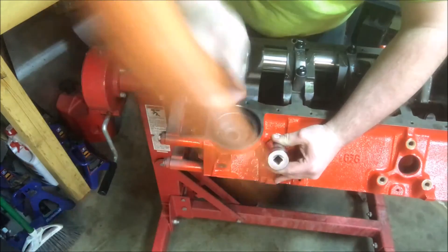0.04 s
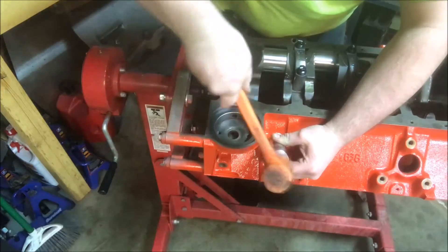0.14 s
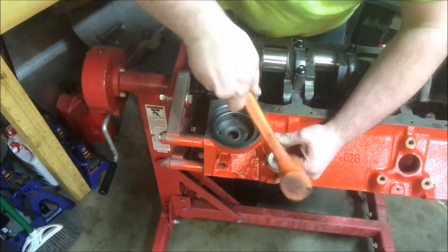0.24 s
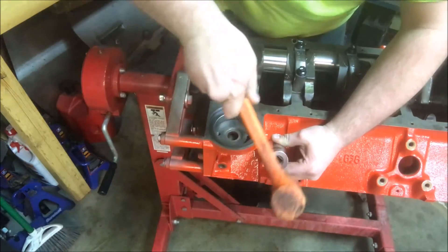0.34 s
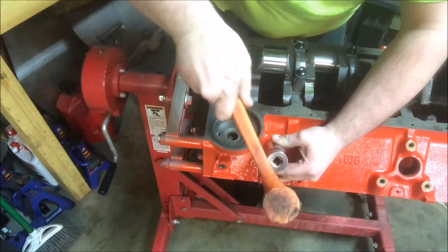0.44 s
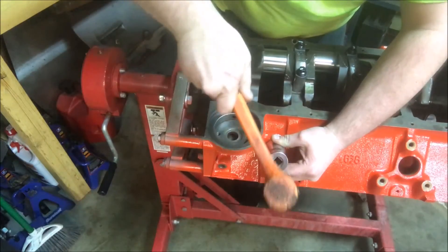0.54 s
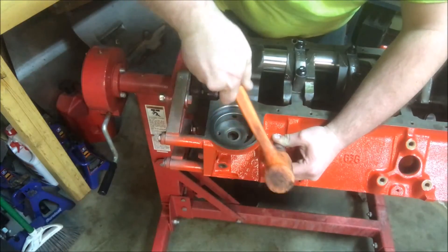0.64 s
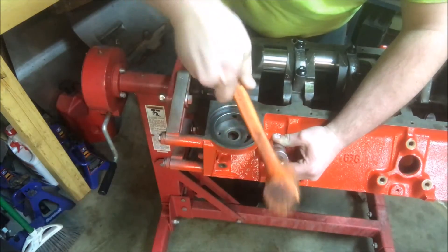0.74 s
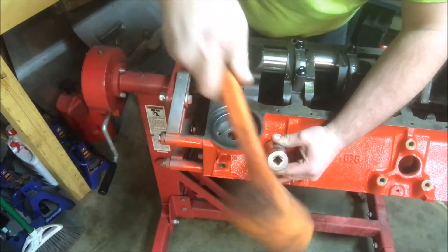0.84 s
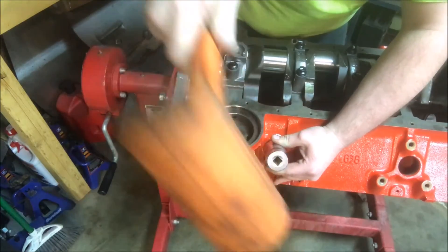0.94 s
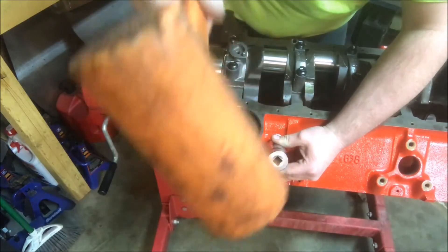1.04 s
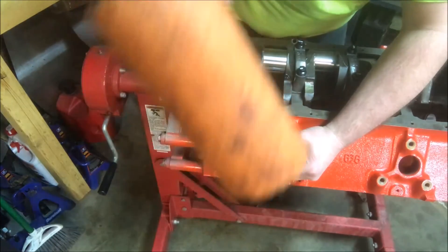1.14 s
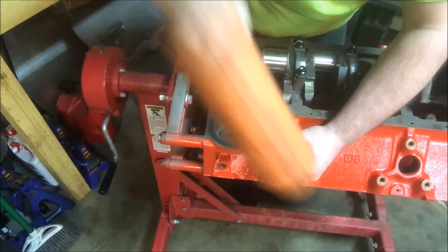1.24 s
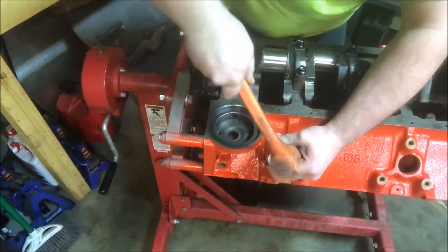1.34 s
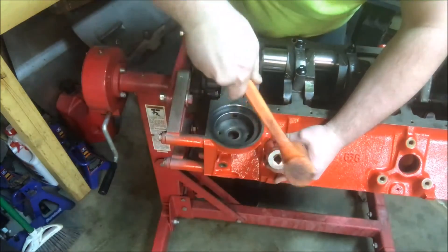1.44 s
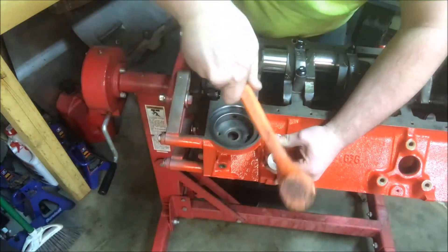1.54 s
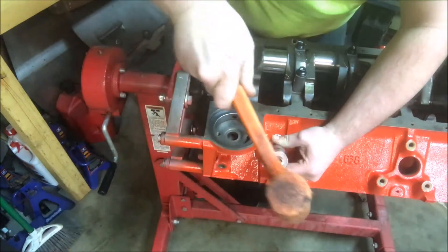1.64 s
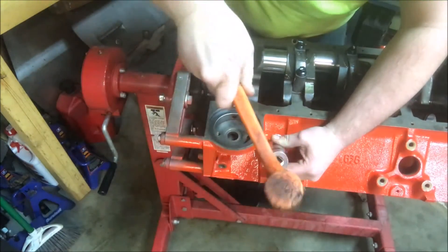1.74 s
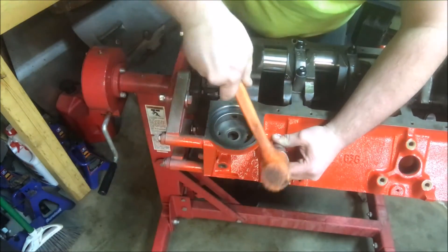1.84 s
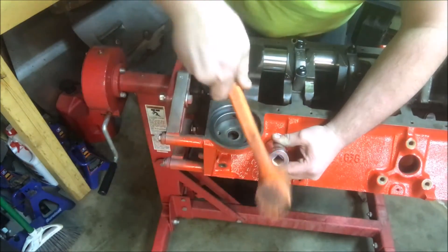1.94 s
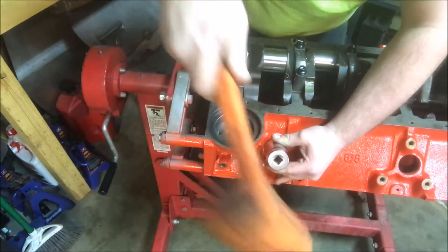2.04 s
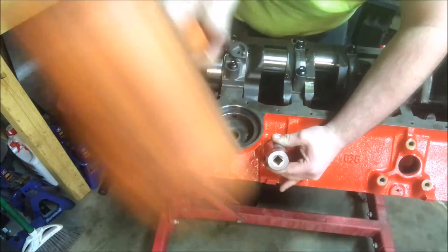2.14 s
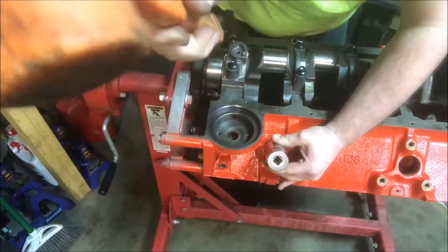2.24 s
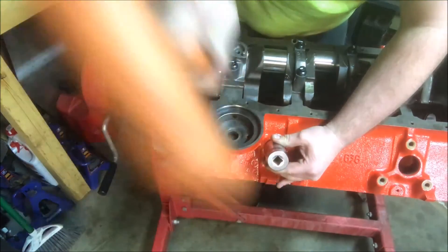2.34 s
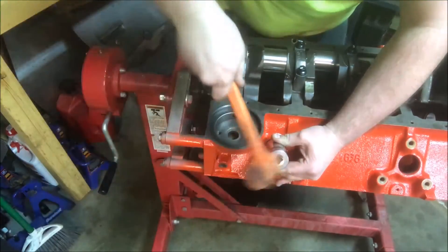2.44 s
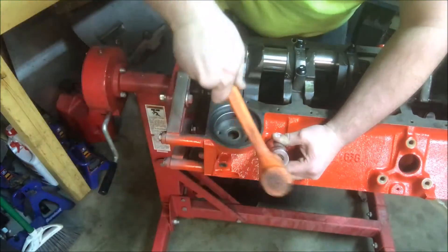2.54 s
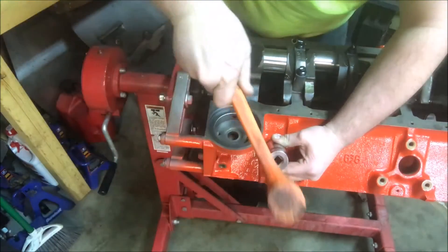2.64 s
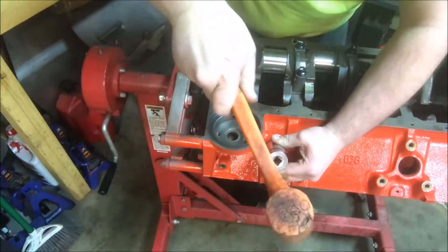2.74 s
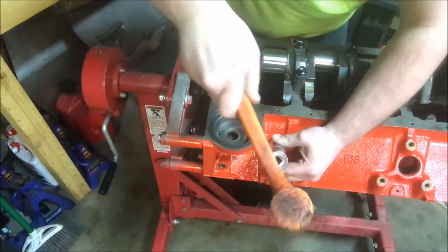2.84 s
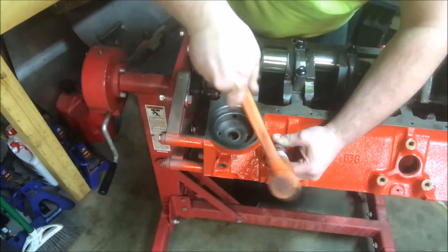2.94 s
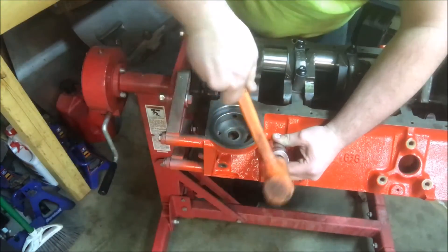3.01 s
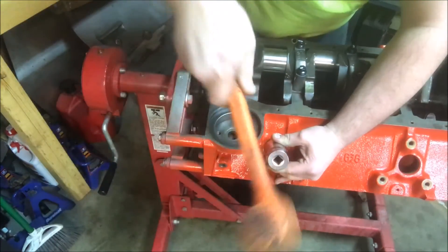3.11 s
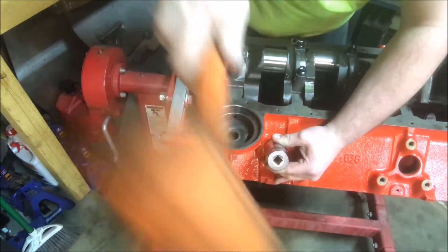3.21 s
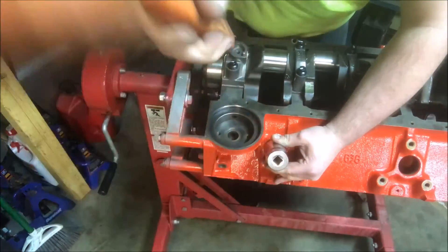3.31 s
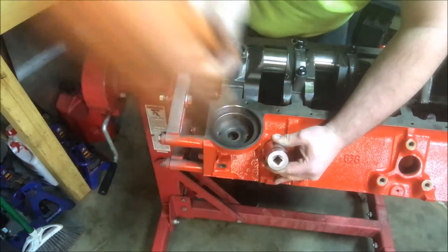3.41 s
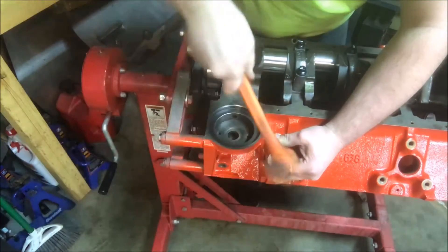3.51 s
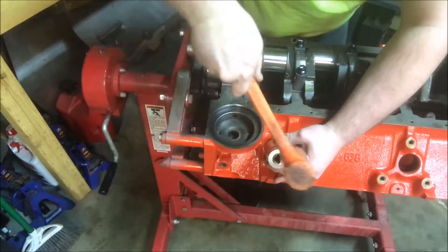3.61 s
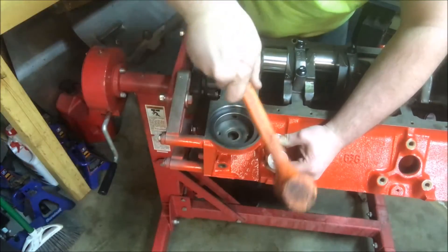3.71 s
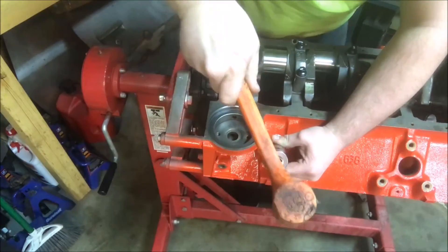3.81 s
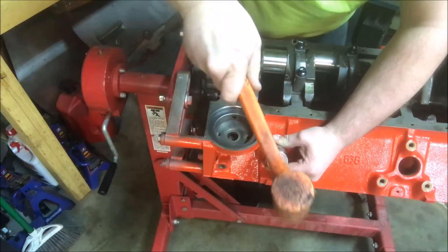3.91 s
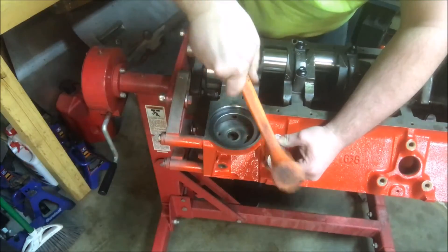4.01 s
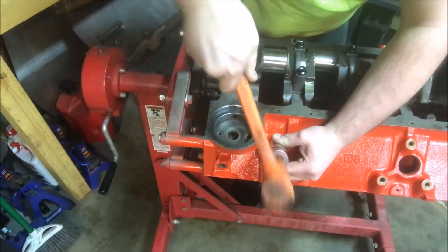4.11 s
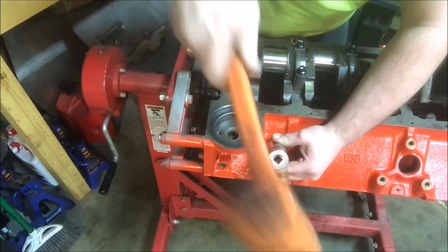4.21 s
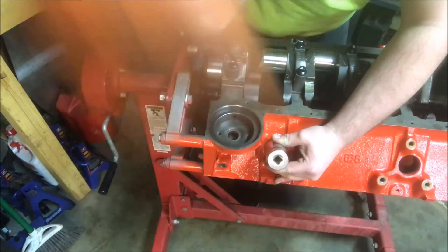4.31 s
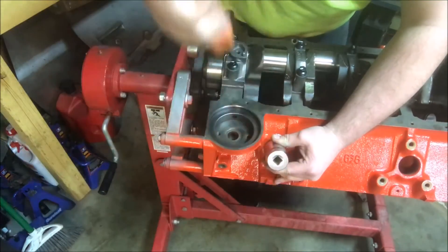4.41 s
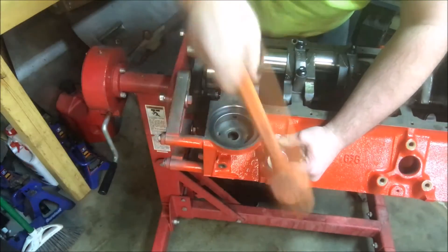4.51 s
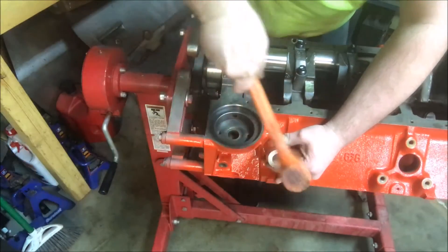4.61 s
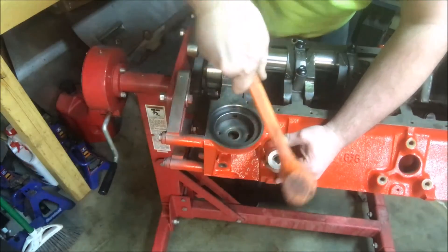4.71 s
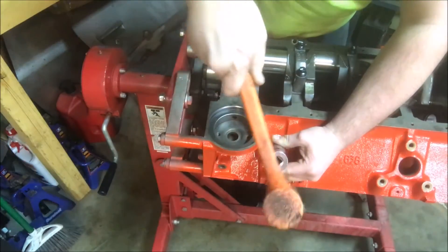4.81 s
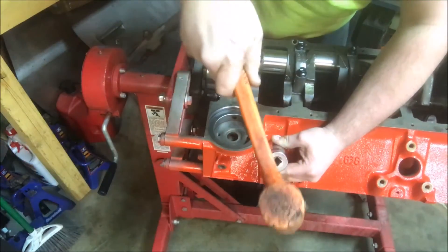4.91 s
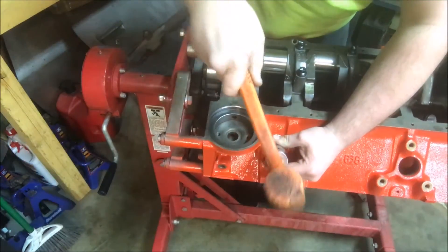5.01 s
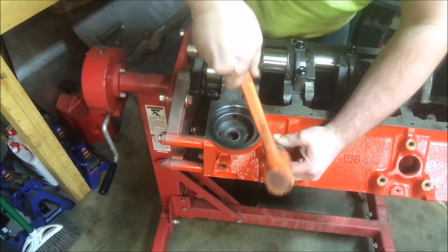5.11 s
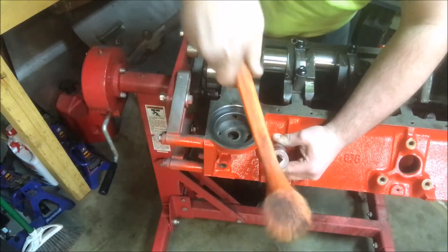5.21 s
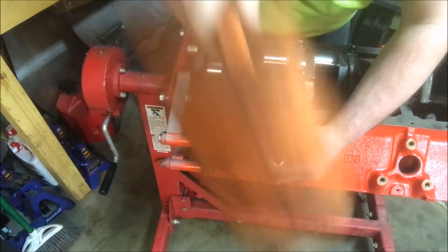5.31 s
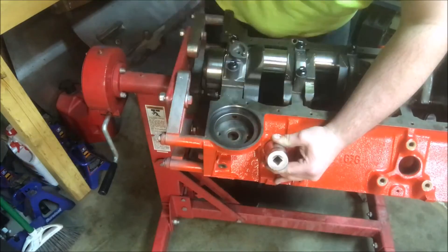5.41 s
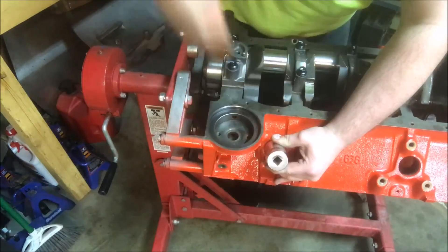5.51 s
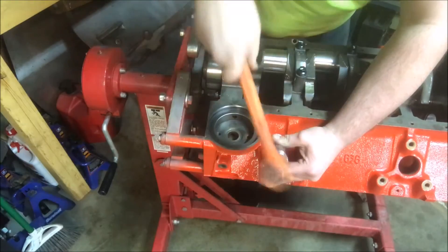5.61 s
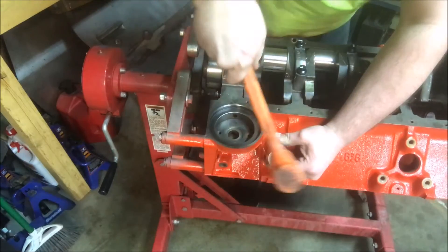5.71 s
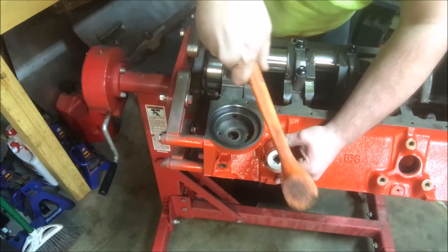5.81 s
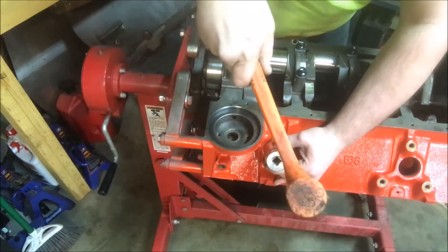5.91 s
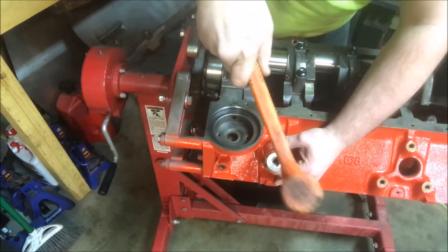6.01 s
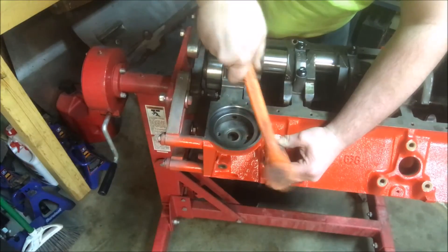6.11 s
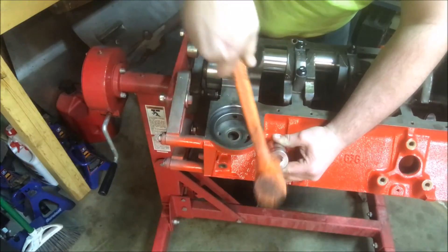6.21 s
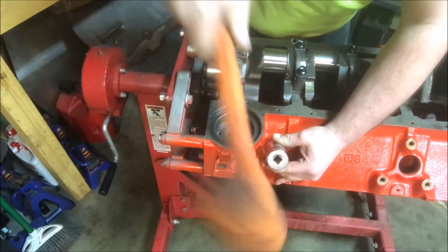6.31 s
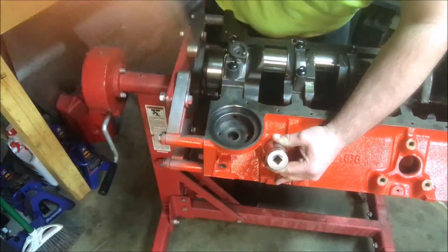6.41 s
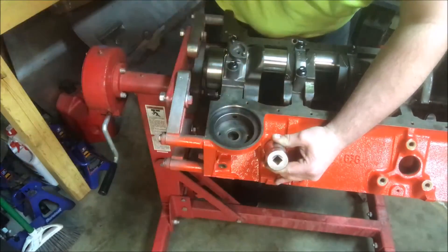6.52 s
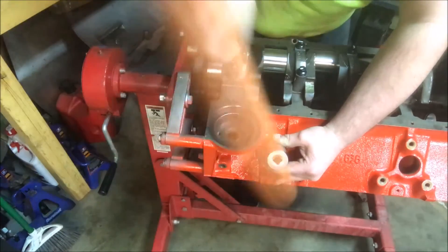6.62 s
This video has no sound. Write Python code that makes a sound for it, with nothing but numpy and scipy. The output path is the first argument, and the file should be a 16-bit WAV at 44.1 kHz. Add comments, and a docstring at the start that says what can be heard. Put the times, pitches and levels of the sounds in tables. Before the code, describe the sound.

Steady mallet knocks on metal, about two a second and alternately strong and softer, clang briefly in a small echoing workshop.

```python
"""A small workshop: a wooden mallet drives a plug into a cast-iron engine block through a steel socket.
Hard blows and light taps alternate; each knocks, sets socket and block clanging and leaves the steel
stand humming. The harder the blow, the brighter it is and the more air it pushes; a faint pre-echo
leads each hard one. The grip rustles on the swing down to a hard blow and on the lift after a light tap,
and now and then it ticks. The room echoes over a bed of still air, and a limiter holds the blows down."""
import sys
import numpy as np
from scipy import signal
from scipy.fft import rfft, irfft
from scipy.io import wavfile
from scipy.ndimage import uniform_filter1d, minimum_filter1d

SR = 44100
rng = np.random.default_rng(int(sys.argv[2]) if len(sys.argv) > 2 else 0)


def log_audio(samples):
    """Write samples as a 16-bit WAV file to the path given in sys.argv[1]."""
    # one column per channel
    frames = np.atleast_2d(samples).T
    # limit to full scale, then quantise
    limited = np.clip(frames, -1, 1)
    pcm = np.round(limited * 32767).astype(np.int16)
    wavfile.write(sys.argv[1], SR, pcm)


N = 293346
TIME = np.arange(N) / SR

# Room tone. Each row: frequency in Hz, relative spectral level in dB.
AIR_SPECTRUM = [(20, -15), (43, 7), (65, -0.5), (100, -2.5), (200, -2.5), (450, -2), (700, -5.5),
                (1200, -4), (1900, -9), (2500, -12), (4000, -14.5), (7500, -22.5), (16000, -33)]
# Skin slipping on the handle. Each row: start in seconds, relative level in dB.
GRIP_TICKS = [(0.0334, -26), (0.182, -33), (1.1184, -37.5), (1.137, -38), (1.2017, -37.5), (1.3668, -25),
              (2.2104, -34), (2.3434, -39), (3.3573, -34), (3.451, -32.5), (4.405, -28.5), (5.46, -29.5)]
# Colour of the grip. Each row: frequency in Hz, relative spectral level in dB.
GRIP_SPECTRUM = [(300, -36.5), (1500, -10), (2500, -2), (4000, -1), (6500, -2), (9000, -11.5), (13500, -11),
                 (16000, -17.5)]
# The mallet brushes the socket once, and once bounces back on to it.
# Each row: start in seconds, force in dB, then ring, ping and clang EQ gains in dB.
TOUCHES = [(0.103, -47, 2.5, -8.5, -9), (4.182, -15.5, -2, -2, 8)]
# Hard blows and light taps in turn.
# Each row: start in seconds, force in dB, ring, ping and clang EQ gains in dB, grip rustle in dB.
BLOWS = [(0.251, -1, -1, 1.5, 4.5, -49.5), (0.748, -11, 6, -4, -0.5, -76),
         (1.4523, -1.5, -1, 3, 4.5, -47.5), (1.9576, -9, 3.5, 2, -5.5, -66.5),
         (2.5653, -1, 5, -4, 4.5, -76), (3.0843, -7, -5.5, -1.5, -4.5, -56),
         (3.638, -1.37, -0.5, 5.5, 3, -68), (4.1632, -7.5, 1, 1, -3.5, -51.5),
         (4.6735, -3.5, 5, -4.5, 8, -50), (5.2154, -7, 5, -3.5, 5, -60.5), (5.745, -1.5, 3.5, 2, 3, -46.5),
         (6.2557, -8, 4.5, -6.5, 1.5, -50.5)]
HARD_BLOWS, LIGHT_TAPS = BLOWS[::2], BLOWS[1::2]
# The iron block's modes. Each row: pitch in Hz, relative level in dB, t60 in seconds.
BLOCK_MODES = [(353, -20, .08), (383, -24, .15), (533, -21, .07), (729, -15, .06), (855, -19, .13),
               (903, -12, .085), (991, -13, .085), (1138, -10, .07), (1244, -10, .07), (1330, -13, .05),
               (1386, -6, .07), (1820, -12, .085), (1912, -11.5, .075), (1985, -18, .14), (2030, -9, .07),
               (2110, -11, .06), (2168, -8.5, .06), (2544, -16, .06), (2990, -16, .06), (3500, -17, .06),
               (3624, -13.5, .07)]
# The steel socket, damped by the fingers. Each row: pitch in Hz, relative level in dB, t60 in seconds.
SOCKET_MODES = [(2901, -8.5, .08), (3365, -9, .05), (3405, -4.5, .06), (4597, -16, .07), (4651, -15.5, .08),
                (13450, -28, .05), (13690, -25, .07), (13880, -27, .06), (14250, -29, .05),
                (14650, -28, .05)]
# The casting's crowd of weaker modes. Each row: frequency in Hz, relative spectral level in dB.
CASTING_SPECTRUM = [(200, -17), (350, -9.5), (900, 7.5), (1400, 9), (1650, 6.5), (2000, 7), (2700, 7),
                    (3600, 6.5), (4600, -0.5), (5000, -7.5), (5600, -4), (10500, -19), (12700, -17),
                    (13750, -9.5), (16000, -20.5)]
# Decay of that crowd. Each row: frequency in Hz, t60 in seconds.
CASTING_T60 = [(200, 0.017), (1000, 0.0094), (3500, 0.086), (7000, .06), (14000, 0.1)]
# The steel stand under the block. Each row: pitch in Hz, relative level in dB, t60 in seconds.
STAND_MODES = [(44.1, -52, 1.8), (133.6, -49, 1.3), (169, -39.5, 0.84), (231.8, -27.5, 0.28)]
# Soft low thumps between blows. Each row: centre in seconds, half-width in seconds, relative level in dB.
THUMPS = [(4.55, 0.042, -47), (5.58, 0.086, -55), (5.66, 0.033, -49), (6.61, 0.06, -54)]
# Colour of the thumps. Each row: frequency in Hz, relative spectral level in dB.
THUMP_SPECTRUM = [(20, -37), (45, 1.5), (70, -7), (110, -9), (200, -60), (500, -86)]
# Colour of the workshop's echo. Each row: frequency in Hz, relative spectral level in dB.
ROOM_SPECTRUM = [(60, -22.5), (200, -12), (500, -15.5), (1000, -14), (2000, -14), (4000, -14), (7000, -11),
                 (14000, -19.5)]
# The echo's tail. Each row: frequency in Hz, t60 in seconds.
ROOM_T60 = [(100, 0.4), (400, 0.61), (1000, 0.58), (2000, 0.62), (4000, 0.53), (7000, 0.45), (14000, 0.19)]


def from_db(db):
    return 10 ** (np.asarray(db) / 20)


def rms_one(x):
    return x / np.sqrt(np.mean(x ** 2) + 1e-20)


def at_hz(points, hz):
    """Read a table on a log-frequency axis."""
    known_hz, values = np.transpose(points)
    return np.interp(np.log(np.maximum(hz, 1)), np.log(known_hz), values)


def add(out, s, sound):
    """Mix a sound in from time s."""
    start = max(round(s * SR), 0)
    out[start:start + len(sound)] += sound[:N - start]


def coloured(x, spectrum):
    """Give a steady signal a spectrum; rms 1."""
    hz = np.fft.rfftfreq(len(x), 1 / SR)
    return rms_one(irfft(rfft(x) * from_db(at_hz(spectrum, hz)), len(x)))


def decay(t60, size):
    return np.exp(-np.log(1000) * TIME[:size] / t60)


def fade_in(rise_s, size):
    return 1 - np.exp(-(TIME[:size] / rise_s) ** 2)


def ring(hz, t60, size):
    """A dying sine."""
    return np.sin(2 * np.pi * hz * TIME[:size]) * decay(t60, size)


def dying_noise(spectrum, t60s, size, hold_s=0):
    """A dense tail: third-octave noise bands hold for hold_s, then each dies at its own rate."""
    t = np.maximum(TIME[:size] - hold_s, 0)
    hz = np.fft.rfftfreq(size, 1 / SR)
    white = rfft(rng.standard_normal(size))
    edges = np.geomspace(50, 17000, 27)
    out = np.zeros(size)
    for low, high in zip(edges, edges[1:]):
        gain = from_db(at_hz(spectrum, hz)) * (hz >= low) * (hz < high)
        t60 = at_hz(t60s, np.sqrt(low * high))
        band = irfft(white * gain, size) * np.exp(-np.log(1000) * t / t60)
        out += rms_one(band) * np.sqrt(np.mean(gain ** 2) / size)
    return out


def band_eq(x, low_hz, high_hz, gain_db):
    """Boost or cut one broad band."""
    band = signal.lfilter(*signal.butter(1, [low_hz, high_hz], "band", fs=SR), x)
    return x + (from_db(gain_db) - 1) * band


def swells(rows):
    """An envelope that rises and falls in a bell for each row."""
    return sum(from_db(db) * np.exp(-2 * ((TIME - s) / half_width) ** 2) for s, half_width, db in rows)


def still_air(level_db=-56):
    """The workshop's air lays a dark, steady bed of noise."""
    return from_db(level_db) * coloured(rng.standard_normal(N), AIR_SPECTRUM)


def skin_grains(per_s, spread_db):
    """Tiny slips of skin on wood, at random moments and of uneven size; rms 1."""
    clicks = (rng.random(N) < per_s / SR) * rng.choice([-1, 1], N)
    sizes = from_db(spread_db * np.minimum(rng.exponential(1, N), 3))
    return coloured(clicks * sizes, GRIP_SPECTRUM)


def grip(swing_lead_s=0.062, lift_lag_s=0.25, tick_db=-3, tick_s=0.00038, creep_db=-25, creep_s=0.036):
    """The grip rustles densely on swings and lifts; around each sharp tick it creeps in lone grains."""
    swings = [(s - swing_lead_s, 0.033, db) for s, *_, db in HARD_BLOWS]
    lifts = [(s + lift_lag_s, 0.027, db) for s, *_, db in LIGHT_TAPS]
    rustle = swells(swings + lifts) * skin_grains(per_s=1300, spread_db=2)
    creep_envelope = swells([(s, creep_s, db + creep_db) for s, db in GRIP_TICKS])
    creep = creep_envelope * skin_grains(per_s=110, spread_db=4)
    tick_envelope = np.zeros(N)
    for s, db in GRIP_TICKS:
        add(tick_envelope, s, from_db(db + tick_db) * np.exp(-TIME[:SR // 20] / tick_s))
    return rustle + creep + tick_envelope * coloured(rng.standard_normal(N), GRIP_SPECTRUM)


def wood(size=8192):
    """The mallet's face lands with a brief crack and a dull thud."""
    crack = from_db(-11.5) * rng.standard_normal(size) * decay(t60=0.01, size=size)
    thud = from_db(14) * ring(hz=850, t60=0.0023, size=size)
    body = from_db(2) * ring(hz=320, t60=0.0042, size=size)
    return thud - body + crack


def metal(modes, vary_db=0.83, detune=0.0031, spread_s=0.003, size=8192):
    """Each mode radiates from another part of the metal and arrives at its own moment."""
    out = np.zeros(size)
    for hz, db, t60 in modes:
        lag = int(rng.random() * spread_s * SR)
        height = from_db(db + vary_db * rng.standard_normal()) * rng.choice([-1, 1])
        pitch_hz = hz * (1 + detune * rng.standard_normal())  # grip and seating shift the pitch
        out[lag:] += height * ring(pitch_hz, t60, size - lag)
    return out


def strike(force_db, socket_db=-1.5, socket_db_per_db=0.16, chatter_s=0.01, low_cut_hz=210):
    """One contact of wood, socket and block; the harder it is, the more the socket speaks."""
    force = from_db(force_db)
    # the socket chatters on the plug while it gives way, and keeps the casting stirred
    casting = dying_noise(CASTING_SPECTRUM, CASTING_T60, size=8192, hold_s=chatter_s * force)
    socket = from_db(socket_db + socket_db_per_db * force_db) * metal(SOCKET_MODES)
    hit = wood() + from_db(0.5) * metal(BLOCK_MODES) + socket + from_db(22.5) * casting
    # so small a contact radiates hardly any bass
    return force * signal.sosfilt(signal.butter(4, low_cut_hz, "high", fs=SR, output="sos"), hit)


def mallet(treble_db=3, treble_db_per_db=0.65):
    """Force sets the brightness of each blow, the landing spot its ring, ping and clang."""
    out = np.zeros(N)
    for s, force_db, ring_db, ping_db, clang_db, *_ in [*BLOWS, *TOUCHES]:
        blow = band_eq(strike(force_db), 1800, 2175, ring_db)
        blow = band_eq(blow, 2720, 3100, ping_db)
        blow = band_eq(blow, 3100, 4700, clang_db)
        blow = band_eq(blow, 5000, 18000, treble_db + treble_db_per_db * force_db)
        add(out, s, blow)
    return out


def pre_echoes(lead_s=0.0228, first_db=-26, second_db=-29, size=8192):
    """A faint double pre-echo sounds 23 and 11 ms ahead of each hard blow."""
    out = np.zeros(N)
    blip = ring(hz=1100, t60=0.008, size=size)
    for s, *_ in HARD_BLOWS:
        for ahead_s, level_db in ((lead_s, first_db), (lead_s / 2, second_db)):
            ghost_ring = from_db(-12) * (metal(BLOCK_MODES) + metal(SOCKET_MODES))
            burst = from_db(-13) * rng.standard_normal(size) * decay(t60=0.012, size=size)
            add(out, s - ahead_s, from_db(level_db) * (blip + ghost_ring + burst))
    return out


def stand_hum(hum_db_per_db=0.23, rise_s=0.0026, size=65536):
    """The heavy block passes each push slowly to the stand, which hums much alike for every blow."""
    out = np.zeros(N)
    hum = sum(from_db(db) * ring(hz, t60, size) for hz, db, t60 in STAND_MODES) * fade_in(rise_s, size)
    for s, force_db, *_ in BLOWS:
        add(out, s, from_db(hum_db_per_db * force_db) * hum)
    return out


def air_puffs(full_force_db=-26.5, puff_db_per_db=2.9, lag_s=0.007):
    """The mallet head pushes one slow swing of air as it lands, adding weight to the hard blows."""
    out = np.zeros(N)
    puff = ring(hz=58, t60=0.11, size=8192)
    for s, force_db, *_ in BLOWS:
        add(out, s + lag_s, from_db(full_force_db + puff_db_per_db * force_db) * puff)
    return out


def soft_thumps(gain_db=1):
    """Short swells of low rumble fall between the later blows."""
    return from_db(gain_db) * swells(THUMPS) * coloured(rng.standard_normal(N), THUMP_SPECTRUM)


def workshop_echo(x, near_db=2, near_t60=0.29, size=32768):
    """Floor and benches answer first; the room's tail builds behind them and dies soonest up top."""
    near = dying_noise(ROOM_SPECTRUM, [(1000, near_t60)], size) * fade_in(rise_s=0.012, size=size)
    far = dying_noise(ROOM_SPECTRUM, ROOM_T60, size) * fade_in(rise_s=0.016, size=size)
    return x + signal.fftconvolve(x, from_db(near_db) * near + far)[:len(x)]


def scene():
    """The mono mix: blows, pre-echoes and grip feed the room; the low layers and room tone stay dry."""
    air = still_air()
    room_send = mallet() + pre_echoes() + grip()
    return (workshop_echo(room_send) + stand_hum() + air_puffs() + soft_thumps() + air)[None]


def limiter(x, ceiling_db=-0.5, release_db_per_s=900):
    """The gain ducks just ahead of each peak over the ceiling and springs back."""
    over_db = np.maximum(20 * np.log10(np.abs(x[0]) + 1e-9) - ceiling_db, 0)
    release_db = release_db_per_s * TIME
    reduction_db = np.maximum.accumulate(over_db + release_db) - release_db
    look_ahead_db = minimum_filter1d(-reduction_db, size=21)
    return x * from_db(uniform_filter1d(look_ahead_db, size=21))


def record(dry):
    """The master chain: the limiter, then a steep high cut."""
    cutoff_hz = 15650
    return signal.sosfilt(signal.ellip(10, .1, 80, cutoff_hz, fs=SR, output="sos"), limiter(dry))


dry = scene()
out = record(dry)
log_audio(out)
```